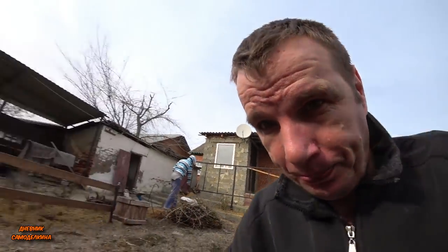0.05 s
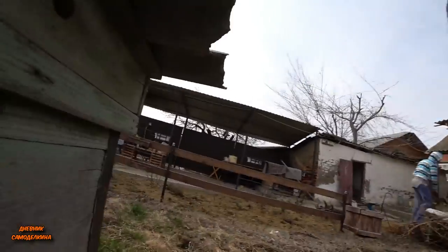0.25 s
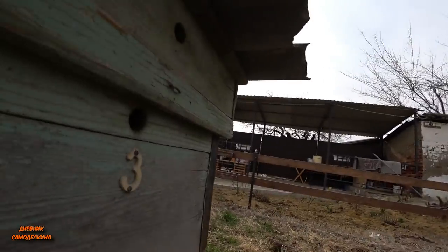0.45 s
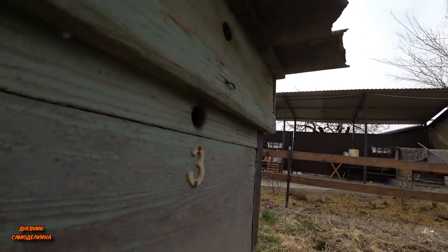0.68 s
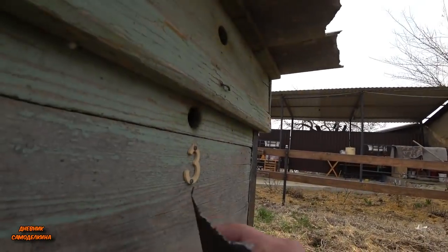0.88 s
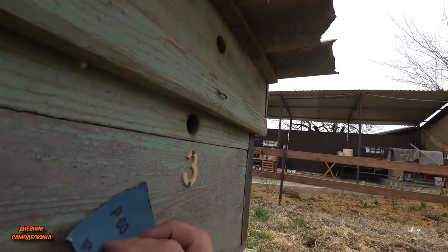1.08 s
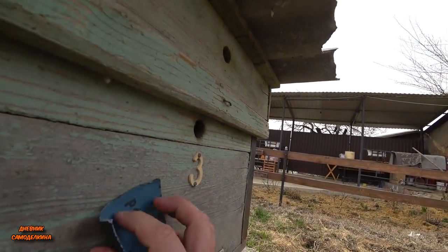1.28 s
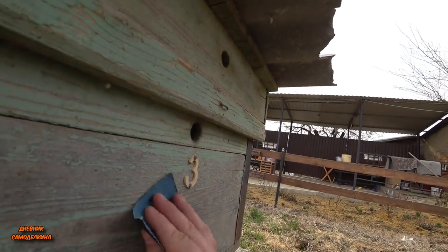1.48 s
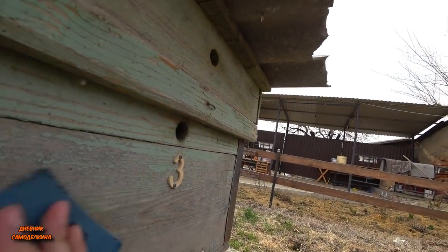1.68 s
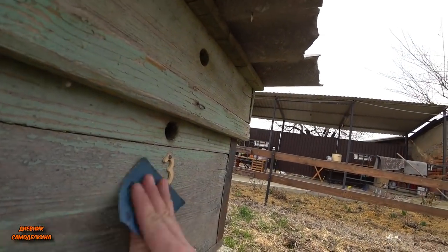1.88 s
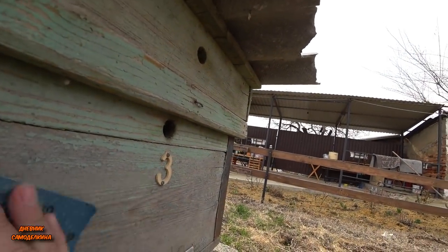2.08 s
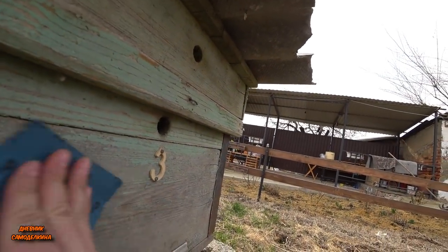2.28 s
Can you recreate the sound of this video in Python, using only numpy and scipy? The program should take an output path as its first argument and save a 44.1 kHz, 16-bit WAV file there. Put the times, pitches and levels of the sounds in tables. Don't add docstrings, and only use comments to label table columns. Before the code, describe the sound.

Rough sanding strokes on a wooden box outdoors, following quiet rustling, paper snaps and a sharp wood knock.

```python
import sys
import numpy as np
from scipy import signal
from scipy.fft import rfft, irfft
from scipy.io import wavfile
from scipy.ndimage import uniform_filter1d

SR = 44100
rng = np.random.default_rng(int(sys.argv[2]) if len(sys.argv) > 2 else 0)


def boost_factor(decibels):
    exponent = np.asarray(decibels, float) / 20
    return 10 ** exponent


def waveform_to_disk(signal):
    frames = np.transpose(np.atleast_2d(signal))
    scaled = np.clip(frames, -1, 1) * 32767
    samples = np.round(scaled).astype(np.int16)
    wavfile.write(sys.argv[1], SR, samples)


N = 103590
T = np.arange(N) / SR

# (start t/s, length/s, level/dB, rise/s, fall/s)
STROKES = [
    (1.395, 0.16, -19, 0.026, 0.015),
    (1.557, 0.25, -15.5, 0.055, 0.067),
    (1.794, 0.016, -15, 0.0097, 0.012),
    (1.807, 0.13, -15.5, 0.029, 0.028),
    (1.95, 0.13, -16.5, 0.012, 0.016),
    (2.076, 0.035, -32.5, 0.0071, 0.0062),
    (1.929, 0.035, -27, 0.01, 0.005),
    (2.095, 0.14, -16, 0.036, 0.013),
    (2.233, 0.11, -16.5, 0.021, 0.023),
]
SANDING_S = STROKES[0][0]
# (t/s, level/dB)
REST = [
    (0.994, -39),
    (1.005, -39),
    (1.2, -40.5),
    (1.33, -46),
    (1.345, -49.5),
    (1.42, -45),
]
DRAG_START_S = REST[0][0]
# (f/Hz, likeness 0-1)
SAME = [(240, 1), (950, .88), (3770, .985), (15000, .8)]


def evened(x):
    return x / np.sqrt(np.mean(abs(x) ** 2) + 1e-20)


def read(points, hz):
    f, value = np.transpose(points)
    return np.interp(np.log(hz + 1), np.log(f + 1), value)


def colour(x, table):
    gain = boost_factor(read(table, np.fft.rfftfreq(N, 1 / SR)))
    return irfft(rfft(x) * evened(gain), N)


def resonate(x, hz, width_hz):
    r = np.exp(-np.pi * width_hz / SR)
    a = [1, -2 * r * np.cos(2 * np.pi * hz / SR), r * r]
    return signal.lfilter([1, 0, -1], a, x) * np.sqrt((1 - r * r) / 2)


def band(x, hz, width_hz):
    return evened(resonate(resonate(x, hz, width_hz), hz, 2 * width_hz))


def grit(per_s, spread_db, patchy_db, bumpy_db):
    size = boost_factor(spread_db * np.minimum(rng.exponential(1, N), 5)) * rng.standard_normal(N)
    clicks = size * (rng.random(N) < per_s / SR)
    z = signal.stft(clicks, nperseg=256, noverlap=192)[2]
    patches = uniform_filter1d(rng.standard_normal(z.shape), size=5, axis=0)
    patches = evened(uniform_filter1d(patches, size=14, axis=1))
    bumps = evened(uniform_filter1d(rng.standard_normal(z.shape[1]), size=6))
    z = z * boost_factor(patchy_db * patches + bumpy_db * bumps)
    return evened(signal.istft(z, nperseg=256, noverlap=192)[1][:N])


def ports(x, same, tilt=0.73):
    # (f/Hz, level/dB)
    balance = [(200, .5), (600, 3), (3770, 3), (15000, -1)]
    # (f/Hz, phase/rad)
    lead = [(300, 0), (1210, .95), (1700, .3), (3000, .25), (16300, .8)]
    hz = np.fft.rfftfreq(256, 1 / SR)
    z = signal.stft(x, nperseg=256, noverlap=192)[2]
    likeness = np.clip(read(same, hz), 0, 1)[:, None]
    scrambled = z * np.exp(2j * np.pi * rng.random(z.shape)) * 2.1
    half = boost_factor(tilt * (read(balance, hz) - 2.2)[:, None] / 2)
    turn = np.exp(0.5j * tilt * read(lead, hz))[:, None]
    shared = np.sqrt((1 + likeness) / 2) * z
    apart = np.sqrt((1 - likeness) / 2) * scrambled
    pair = np.array([(shared + apart) * half * turn, (shared - apart) / half / turn])
    bass_cut = signal.butter(4, 150, "high", fs=SR, output="sos")
    return signal.sosfilt(bass_cut, signal.istft(pair, nperseg=256, noverlap=192)[1][:, :N])


def panned(pair, db):
    return pair * np.array([boost_factor(db / 2), boost_factor(-db / 2)]).reshape(len(pair), -1)


def stroke_power():
    power = boost_factor(2 * -44) * (T > SANDING_S)
    for start, length, db, rise, fall in STROKES:
        u, left = T - start, start + length - T
        edge = np.clip(u / rise, 0, 1) ** 1.03 * np.clip(left / fall, 0, 1) ** 0.97
        arch_db = -1.5 * np.sin(np.pi * np.clip(u / length, 0, 1))
        power = power + (edge * boost_factor(db + arch_db)) ** 2
    return power


def hole_ring():
    # (t/s, level/dB)
    crossings = [
        (1.46, -13),
        (1.565, -9),
        (1.795, -5),
        (1.87, -11),
        (1.95, 4),
        (2.0, -10),
        (2.255, -7),
    ]
    ring = np.zeros(N)
    for s, db in crossings:
        u = np.maximum(T - s, 0)
        ring += boost_factor(db) * (1 - np.exp(-u / 0.0023)) * np.exp(-u / 0.028)
    return ring


def sanding():
    # (t/s, place 0 = by the hole, 1 = left end)
    path = [
        (1.38, 0.66),
        (1.55, 0.29),
        (1.62, 0.71),
        (1.79, 0.96),
        (1.94, 0.53),
        (2.085, 0.85),
        (2.235, 0.61),
        (2.35, 0.84),
    ]
    # (f/Hz, level/dB)
    by_hole = [(88, -58), (150, -17.5), (612, -9), (716, -5), (1940, -10), (2100, 3), (2700, -6.5),
               (7470, -3), (16000, -14)]
    # (f/Hz, level/dB)
    left_end = [(88, -66), (150, -104), (689, -14), (1340, -4.5), (1500, -4.5), (1790, -5.5), (7180, 0),
                (11700, -8), (16000, -37)]
    # (middle t/s, length/s, f/Hz, level/dB)
    bites = [(1.424, 0.0085, 4400, -2.5), (1.46, 0.0042, 4130, -1), (1.479, 0.051, 8440, -5.5),
             (1.53, 0.034, 4300, -14), (1.643, 0.028, 2920, -22), (1.686, 0.024, 6100, -14),
             (1.727, 0.034, 3500, -11), (1.896, 0.0084, 3170, -16), (2.039, 0.03, 6800, -11.5),
             (2.042, 0.025, 2650, -10), (2.156, 0.039, 3500, -14), (2.282, 0.032, 3760, -7.5),
             (2.284, 0.019, 7450, -12.5)]
    # (level/dB, level/dB)
    pan_db = (-1.4, 4.5)
    power, place = stroke_power(), np.clip(np.interp(T, *np.transpose(path)), 0, 1)
    press = np.sqrt(power)
    drive = grit(20000, spread_db=1.6, patchy_db=1.2, bumpy_db=1.0)
    face = (1 - place) * colour(drive, by_hole) + place * colour(drive, left_end)
    panel = boost_factor(-17.5) * np.sqrt(place) * resonate(drive, 3120, 710)
    for s, length, hz, db in bites:
        panel = panel + boost_factor(db) * np.exp(-((T - s) / length) ** 2) * band(drive, hz, 0.33 * hz)
    rub = ringing(press * (face + panel))
    rub += press * hole_ring() * band(rng.standard_normal(N), 2120, 280)
    belly = boost_factor(-27.5) * place ** 11.1 * (T > SANDING_S) * evened(power ** 0.14)
    rub += belly * band(drive, 646, 1070)
    sway_db = 2.1 * evened(uniform_filter1d(rng.standard_normal(N), size=1800))
    boom = boost_factor(-51.5 - 12 * place + sway_db) * evened(power ** 0.34 + 0.55 * (T > 1))
    box = boom * band(drive, 262, 90)
    return panned(ports(rub + box, SAME), pan_db[0] + (pan_db[1] - pan_db[0]) * place)


def ringing(x, count=24):
    t60, ring_db = 0.03, -9
    progress = (T - SANDING_S) / (T[-1] - SANDING_S)
    t = np.arange(round(t60 * SR)) / SR
    out, noise = np.zeros(N), rng.standard_normal((count, len(t)))
    for k in range(count):
        tail = noise[k] * boost_factor(-60 * t / t60)
        near = np.cos(np.pi / 2 * np.clip(abs(progress * (count - 1) - k), 0, 1))
        out += signal.oaconvolve(x * near, tail / np.linalg.norm(tail))[:N]
    return (x + boost_factor(ring_db) * out) / np.sqrt(1 + boost_factor(2 * ring_db))


def scuffs():
    # (start t/s, length/s, level/dB, brightness 0-1)
    rubs = [(0.112, 0.0061, -37, 1), (0.173, 0.015, -36.5, 1), (0.186, 0.078, -40.5, 0.7),
            (0.335, 0.0066, -34, 0.8), (0.439, 0.034, -46, 1), (0.514, 0.045, -37, 0.68),
            (.547, 0.024, -39.5, 0.8), (0.568, 0.02, -48, 0.3), (0.595, 0.015, -31, 0.38),
            (0.618, 0.027, -52, 0), (0.682, 0.038, -44, 0.53), (0.773, 0.17, -45.5, 0.53),
            (0.856, 0.12, -37.5, 0.83), (1.007, 0.041, -31.5, 0.26), (1.027, 0.01, -39, 0.03),
            (1.045, 0.031, -39, 0.8), (1.088, 0.026, -23, 0.87), (1.104, 0.017, -21, 0.82),
            (1.121, 0.0088, -24, 0.6), (1.153, 0.044, -29, 0.42), (1.201, 0.056, -27.5, 0.69),
            (1.252, 0.069, -29.5, 0.74), (1.289, 0.087, -34, 1), (1.353, 0.03, -34, 0.9),
            (1.378, 0.029, -37, 0.4)]
    # (f/Hz, level/dB)
    dull_colour = [(300, -21.5), (1300, 2), (2100, 0), (3890, 6), (5250, -6), (16000, -19)]
    # (f/Hz, level/dB)
    bright_colour = [(180, -62), (300, -25.5), (2280, -18), (7200, -7.5), (10600, -14), (16000, -40)]
    # (middle t/s, length/s, f/Hz, width/Hz, level/dB)
    swish = (.892, .032, 1800, 450, -38.)
    drive = grit(11000, spread_db=2.5, patchy_db=-2.0, bumpy_db=-1.5)
    dull, bright, out = colour(drive, dull_colour), colour(drive, bright_colour), np.zeros(N)
    for start, length, db, share in rubs:
        shape = np.sin(np.pi * np.clip((T - start) / length, 0, 1) ** 0.61) ** 2.4
        out += boost_factor(db) * shape * ((1 - share) * dull + share * bright)
    s, length, hz, width_hz, db = swish
    return out + boost_factor(db) * np.exp(-((T - s) / length * 2.2) ** 2) * band(drive, hz, width_hz)


def snaps():
    # (t/s, peak level/dB, f/Hz)
    cracks = [(.106, -27, 5200), (.3524, -17, 5100), (0.6469, -17, 6900), (1.3346, -5.5, 7900),
              (1.3907, -20, 5500), (1.948, -8, 7860), (2.107, -11, 5500), (0.205, -24, 2450),
              (0.209, -28, 2800), (0.211, -33, 3000), (1.0116, -29, 3970), (1.0292, -22, 3950),
              (1.1634, -22, 4800), (1.2122, -13, 6400), (1.277, -29, 5000), (1.366, -24, 6300),
              (1.412, -29, 3200), (1.4166, -12, 5500), (1.4605, -13, 4500), (1.4825, -4, 7950),
              (1.569, -22, 7800), (1.578, -36, 2480), (1.598, -9, 7900), (1.605, -33, 7900),
              (1.83, -6, 4000), (1.9556, -14, 2980), (2.093, -30, 8900), (2.111, -6.5, 4950)]
    out, noise = np.zeros(N), rng.standard_normal(N)
    for s, db, hz in cracks:
        crack = (T > s) * boost_factor(-60 * np.maximum(T - s, 0) / 0.011) * noise
        crack[round(s * SR) + 1] += 3.2
        crack = resonate(crack, hz, 5000)
        out += boost_factor(db) * crack / abs(crack).max()
    return out


def paper():
    return panned(ports(scuffs() + snaps(), SAME), 1.8)


def knocks():
    # (t/s, level/dB, share of the low pitches)
    hits = [(0.207, -38, -0.027), (0.3522, -51, -0.63), (.649, -35.5, 0.047), (.768, -39, -0.035),
            (.986, -65, -0.038), (.9947, -11, 0.072), (.998, -25, -0.32), (0.9994, -21, -0.26),
            (1.031, -17, 0.4), (1.412, -29, .6), (1.965, -6.5, 0.95)]
    # (f/Hz, level/dB, time to fall 60 dB/s)
    modes = [(274, -16, 0.035), (406, -15, 0.027), (650, -5, 0.016), (970, -17, 0.027), (1105, -5, 0.024),
             (1290, 1.5, 0.018), (1433, -15.5, 0.016)]
    out, shifts = np.zeros(N), rng.random((len(hits), len(modes)))
    for (s, db, low), row in zip(hits, shifts):
        u = np.maximum(T - s, 0)
        for (hz, mode_db, t60), shift in zip(modes, row):
            lean_db = -14 * low * np.log2(hz / modes[0][0]) + 2.0 * low
            ring = boost_factor(db + mode_db + lean_db - 60 * u / t60) * (1 - np.exp(-u * hz))
            out += ring * np.sin(2 * np.pi * hz * (0.985 + 0.068 * shift) * u)
    return out


def bumps():
    # (t/s, level/dB, f/Hz)
    thuds = [(.204, -38, 200), (.205, -41, 290), (.206, -40, 434), (.35, -44.5, 378), (.405, -54, 229),
             (.555, -48, 258), (.555, -57, 550), (.6, -54, 614), (.646, -38, 355), (.647, -44, 600),
             (.92, -52, 400), (.766, -52, 330), (.766, -54, 600), (.995, -34, 265)]
    out = np.zeros(N)
    for s, db, hz in thuds:
        u = np.maximum(T - s, 0)
        out += boost_factor(db - 60 * u / 0.032) * (1 - np.exp(-u * hz)) * np.sin(2 * np.pi * hz * u)
    return out


def resting_sheet():
    # (f/Hz, level/dB)
    resting = [(100, -30), (500, -15), (950, -9), (1380, -1), (1950, -10), (4300, -9), (5700, -17),
               (16000, -34)]
    s, db = np.transpose(REST)
    drag = colour(grit(12000, spread_db=1.5, patchy_db=2.0, bumpy_db=0.3), resting)
    return (T > DRAG_START_S) * drag * boost_factor(np.interp(T, s, db) + 3.0)


def rumble():
    db = -71.5 + 5.5 * (T > SANDING_S) - 7.6 * (T < DRAG_START_S)
    return resonate(rng.standard_normal(N), 45, 87) * boost_factor(db)


def board():
    return panned(ports(knocks() + bumps() + resting_sheet(), SAME), 0.29) + rumble()


def bird():
    # (t/s, f/Hz, level/dB)
    song = [
        (.737, 4000, -63),
        (.746, 4550, -52),
        (.76, 4650, -51),
        (.775, 4450, -53),
        (.785, 4100, -63),
    ]
    s, hz, db = np.transpose(song)
    wobble = 1 + 0.01 * evened(uniform_filter1d(rng.standard_normal(N), size=150))
    phase = 2 * np.pi * np.cumsum(np.interp(T, s, hz) * wobble) / SR
    chirp = boost_factor(np.interp(T, s, db, -140, -140)) * np.sin(phase)
    return panned(np.array([chirp, chirp]), 3.6)


def yard():
    # (t/s, brush level/dB, clothes level/dB)
    loudness = [(0, -44, -48.5), (.21, -44, -50), (.245, -43, -61), (.3, -44, -56), (.37, -44, -79),
                (.5, -47, -98), (.7, -47.5, -90), (.72, -51, -80), (.8, -49.5, -91), (.94, -46.5, -55),
                (.968, -54, -87), (.978, -63, -94), (.986, -62, -94), (0.998, -43.5, -94), (1.33, -43, -94),
                (1.342, -59, -101), (2.35, -56, -94)]
    # (f/Hz, level/dB)
    hiss = [(18, -60), (30, -33), (400, -10), (937, -9.5), (1430, -7), (2010, -5), (3140, -1), (16000, -14)]
    # (f/Hz, likeness 0-1)
    same_yard = [(100, .97), (400, .75), (2400, .4)]
    s, db, low_db = np.transpose(loudness)
    drive = grit(20000, spread_db=-0.6, patchy_db=0.0, bumpy_db=-1.45)
    clothes = boost_factor(np.interp(T, s, low_db)) * band(drive, 950, 1000)
    brush = boost_factor(np.interp(T, s, db)) * colour(drive, hiss)
    return ports(brush + clothes, same_yard, tilt=0.14)


def scene():
    return sanding() + paper() + board() + bird() + yard()


def roll_off(x):
    return signal.sosfilt(signal.butter(12, 16680, fs=SR, output="sos"), x)


def record(dry):
    ceiling, fade_s, edge_hz = 0.75, 0.0037, 15800
    bass_cut = signal.butter(2, 300, "high", fs=SR, output="sos")
    shaved = signal.sosfiltfilt(bass_cut, dry - ceiling * np.tanh(dry / ceiling))
    soft = (dry - shaved) * np.clip((T[-1] - T) / fade_s, 0, 1)
    edge = signal.firwin(255, edge_hz, window=("kaiser", 8), fs=SR)
    return roll_off(signal.oaconvolve(soft, edge[None], "same"))


dry = scene()
out = record(dry)
waveform_to_disk(out)
```